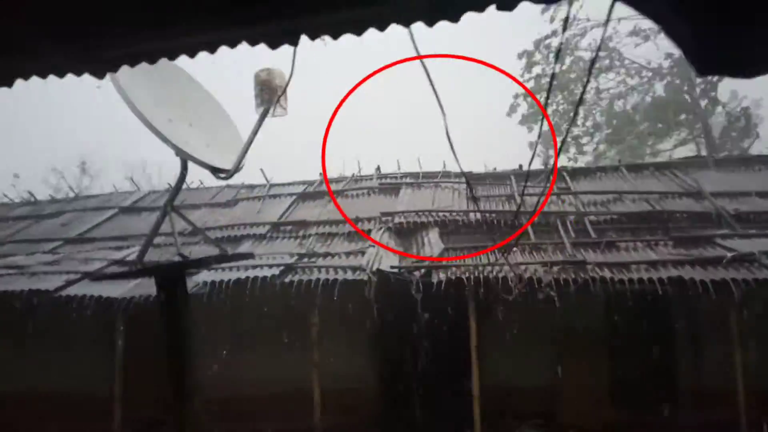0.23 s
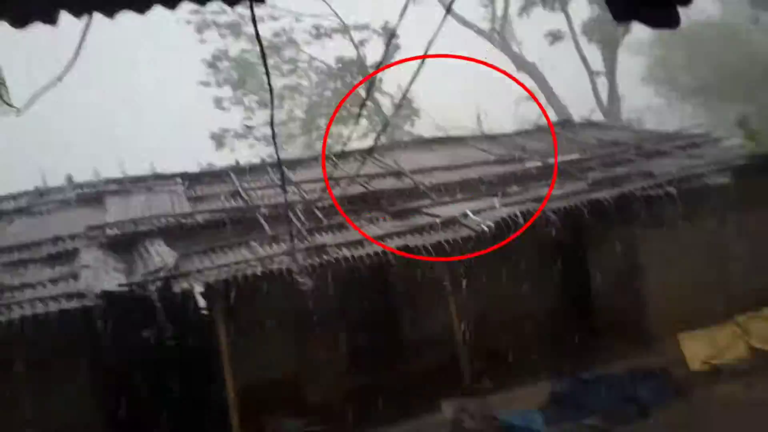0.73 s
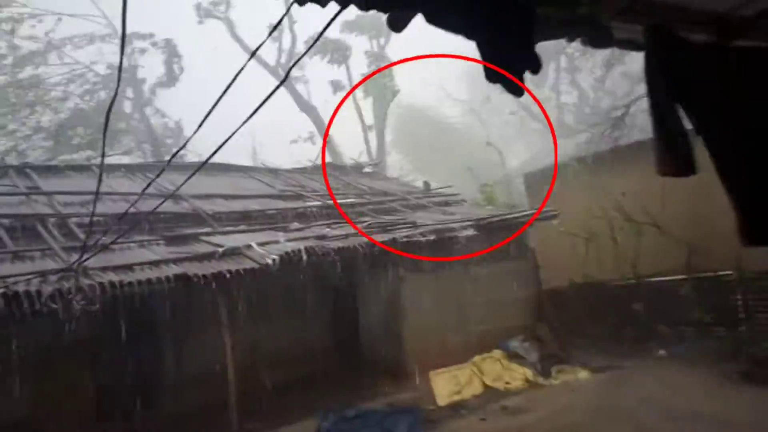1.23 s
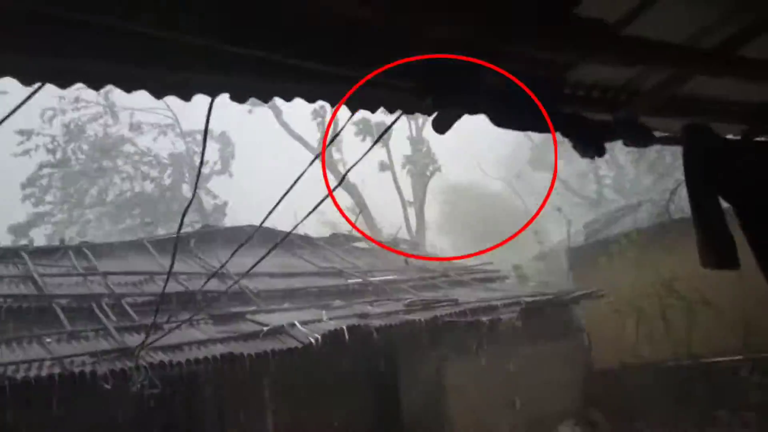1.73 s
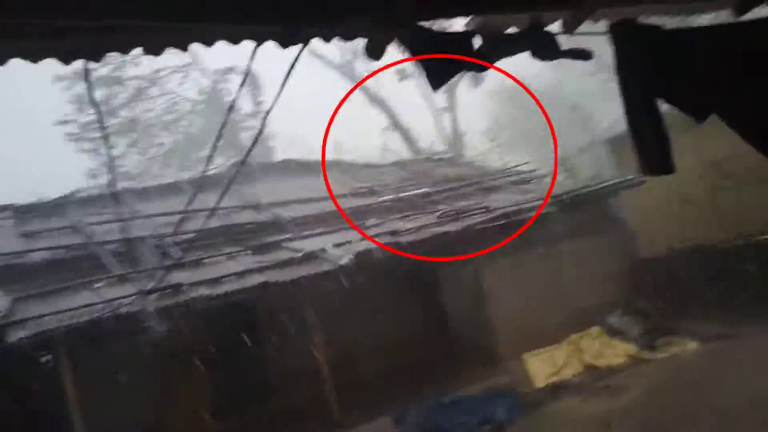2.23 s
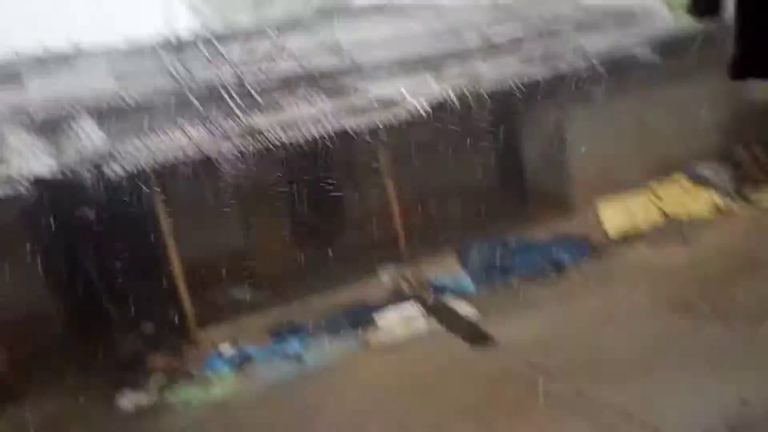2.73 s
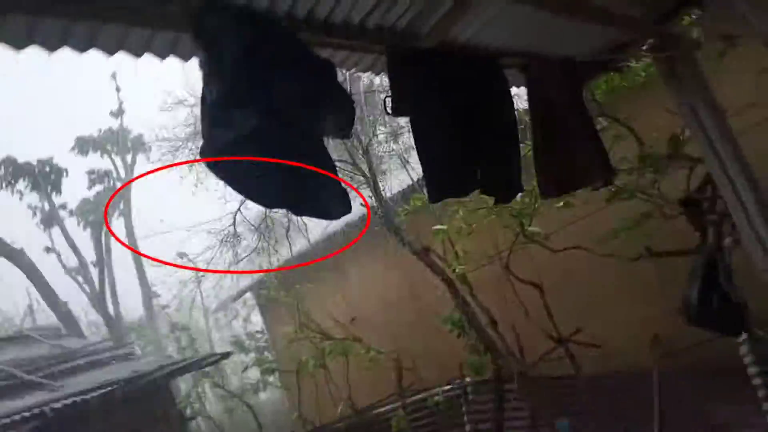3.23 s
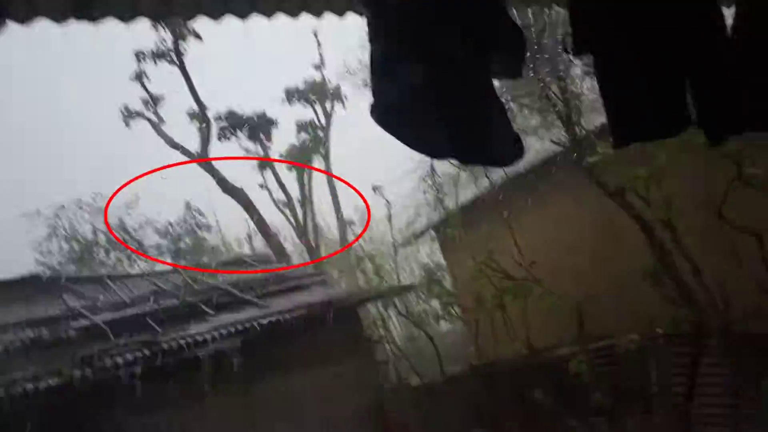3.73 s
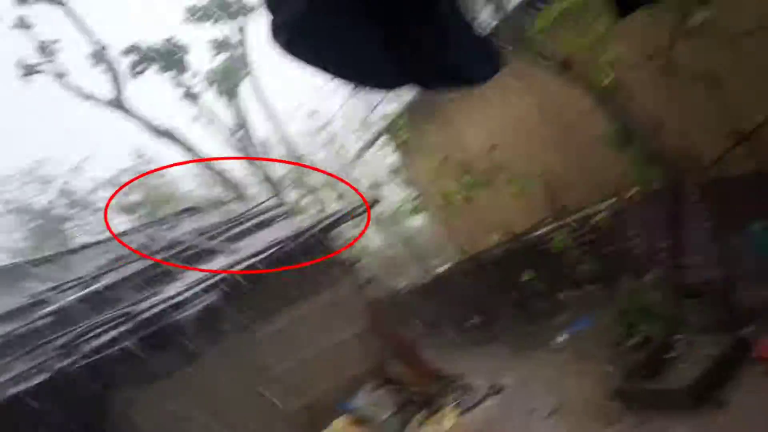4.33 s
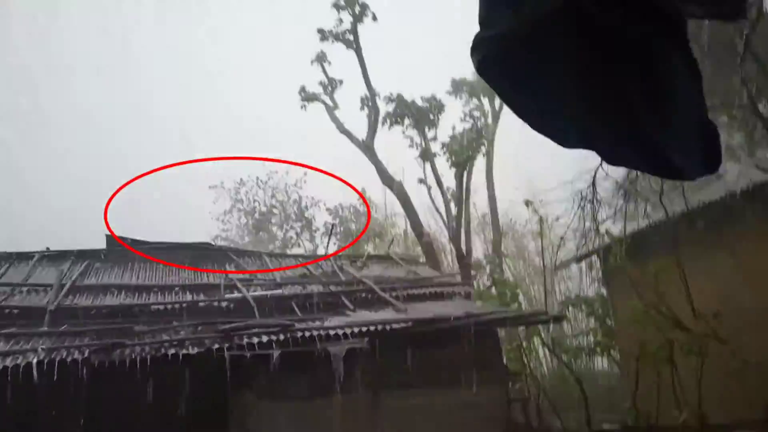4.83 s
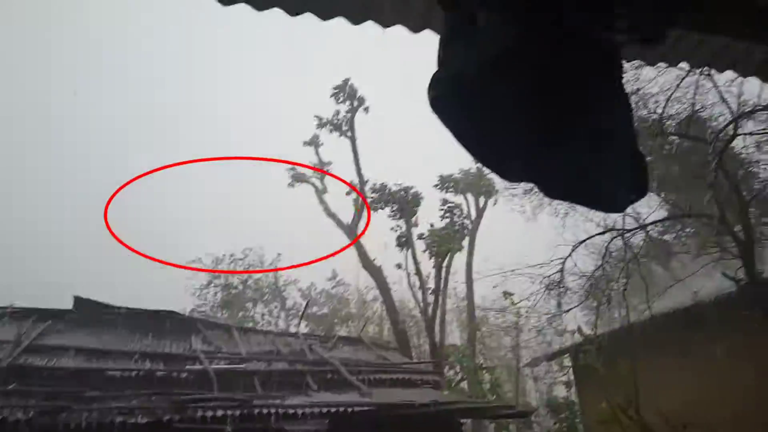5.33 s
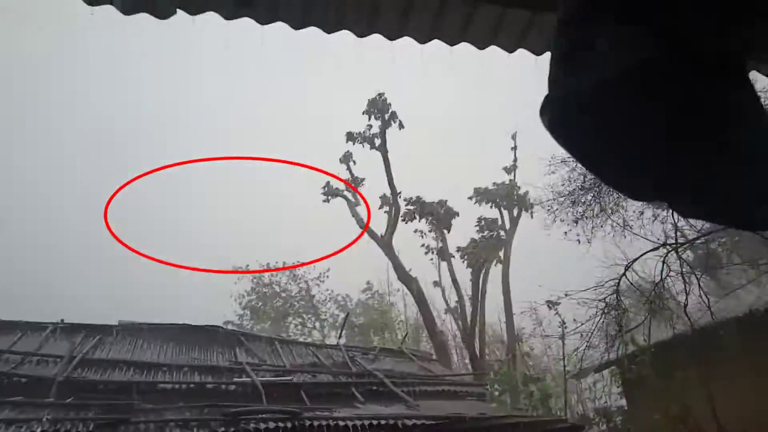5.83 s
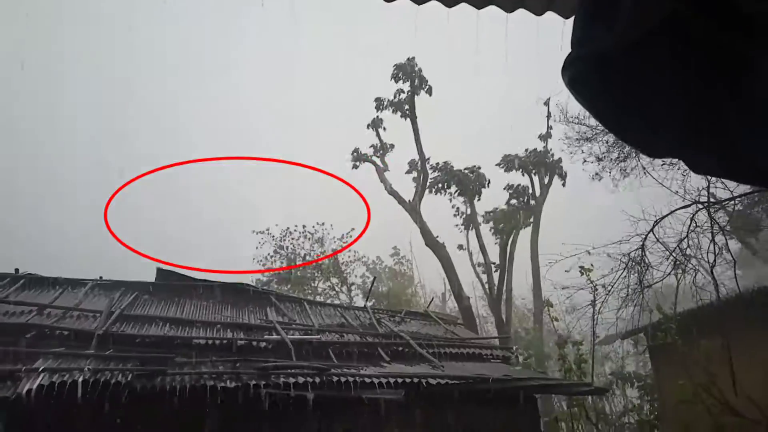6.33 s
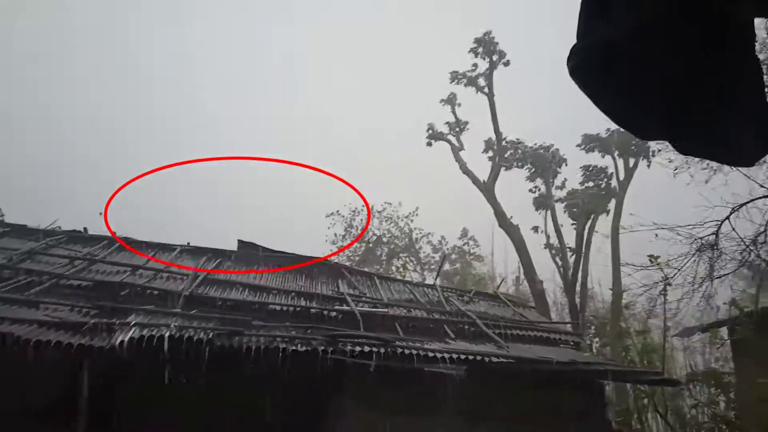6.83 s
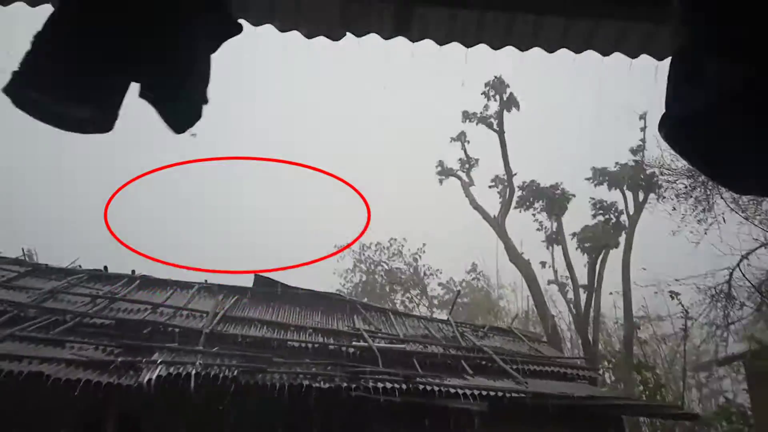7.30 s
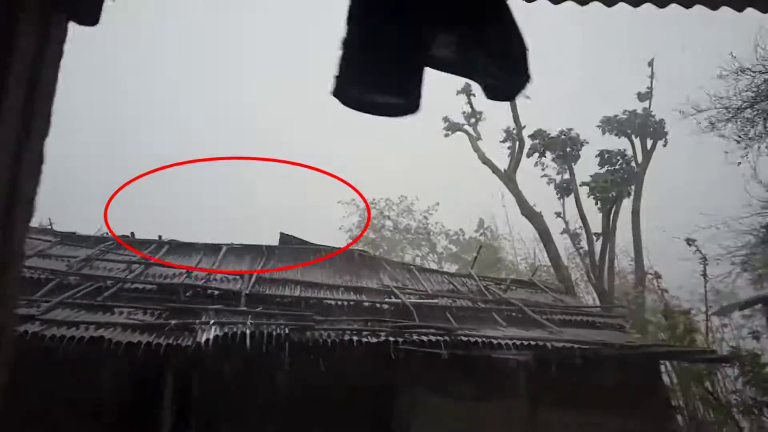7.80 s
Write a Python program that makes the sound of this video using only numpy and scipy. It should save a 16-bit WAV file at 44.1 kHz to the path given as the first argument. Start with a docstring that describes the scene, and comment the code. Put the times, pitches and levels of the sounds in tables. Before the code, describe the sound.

A windy downpour heard close by through one small microphone, the same in both channels. First, hissing spray, broad rain rush and roof drumming with loose-sheet knocks and short crackles. A tiny near-silent gap at three seconds breaks it; the rain swells back with less hiss and a hollow midrange colour that shifts. Soft low wind thumps grow frequent, and a few dull knocks return late.

```python
"""Heavy rain in a windstorm

Heard under an eave by one small microphone, in two scenes joined by a cut and a fade-in.
Dense random drops, coloured in bands, make the rush and spray and drum on corrugated roofs.
Struck resonances knock and thump, short noise bursts stand out, and low noise buffets in gusts.
In the second scene the microphone turns: spectra crossfade and a hollow resonance moves.
"""
import sys
import numpy as np
from scipy import signal
from scipy.fft import rfft, irfft, next_fast_len
from scipy.io import wavfile

SR = 44100
rng = np.random.default_rng(int(sys.argv[2]) if len(sys.argv) > 2 else 0)


def wav_record(signal):
    """Record a signal, one row per channel, as 16-bit PCM in the file named by sys.argv[1]."""
    frames = np.transpose(np.atleast_2d(signal))
    bounded = np.clip(frames, -1, 1)
    # unit amplitude maps onto the largest positive 16-bit level
    quanta = np.round(bounded * 32767).astype(np.int16)
    wavfile.write(sys.argv[1], SR, quanta)


N = 355578
TIME_S = np.arange(N) / SR


def from_db(db):
    """Decibels to amplitude gain."""
    return 10 ** (np.asarray(db) / 20)


def rms_one(x):
    """Scale to unit rms."""
    return x / np.sqrt(np.mean(x ** 2) + 1e-20)


def in_time(rows):
    """Interpolate a two-column time curve to one value per sample."""
    time_s, value = np.transpose(rows)
    return np.interp(TIME_S, time_s, value)


def colour(x, spectrum):
    """Filter x by a spectrum drawn over log frequency; rms 1."""
    size = next_fast_len(N)
    hz = np.maximum(np.arange(size // 2 + 1) * SR / size, 1)
    point_hz, point_db = np.transpose(spectrum)
    gain_db = np.interp(np.log(hz), np.log(point_hz), point_db, left=-100, right=-100)
    filtered = irfft(rfft(x, size) * from_db(gain_db), size)
    return rms_one(filtered[:N])


def drift(corner_hz):
    """Slow random wander: noise twice through a one-pole low-pass; rms 1."""
    r = np.exp(-2 * np.pi * corner_hz / SR)
    noise = rng.standard_normal(N + SR)
    wander = signal.lfilter([1], [1, -2 * r, r * r], noise)
    return rms_one(wander[SR:])  # first second settles the filter


def drops(per_s, spread_db, far_share, clump_db, clump_hz):
    """Sparse impacts of uneven size over the noise blur of far drops, swelling in clumps."""
    size_db = spread_db * np.minimum(rng.exponential(1, N), 4)
    impacts = from_db(size_db) * rng.choice([-1, 1], N)
    near = rms_one(impacts * (rng.random(N) < per_s / SR))
    far = rng.standard_normal(N)
    mix = np.sqrt(1 - far_share) * near + np.sqrt(far_share) * far  # far_share is of power
    return mix * from_db(clump_db * drift(clump_hz))


def ring(start_s, peak_db, pitch_hz, pole_t60_s):
    """Soft contact: a click through two equal resonances swells before it decays."""
    click = np.full(N, 1e-18)
    click[round(start_s * SR)] = 1
    r = from_db(-60 / (pole_t60_s * SR))
    w = 2 * np.pi * pitch_hz / SR
    resonance = [1, 0.0083, -1.004, 1, -2 * r * np.cos(w), r * r]
    tone = signal.sosfilt([resonance] * 2, click)
    return from_db(peak_db) * tone / np.abs(tone).max()


# microphone turn: (time [s], turn [0-1])
MICROPHONE_TURN = [(3.6, 0), (3.9, 0.3), (4.3, 0.35), (4.55, 1), (5.4, 0.81), (8.0, 0.93)]


def turning(x, before, after):
    """Crossfade between two colours of x as the microphone turns."""
    turn = in_time(MICROPHONE_TURN)
    return (1 - turn) * colour(x, before) + turn * colour(x, after)


# buffeting spectra: (frequency [Hz], relative density [dB])
BUFFET_SPECTRUM_FIRST = [(12, -53), (25, -26), (50, -21), (83, -3.5), (170, 1.5), (220, -48.5)]
BUFFET_SPECTRUM_SECOND = [(12, -44), (20, -11), (102, 3.5), (170, 3.5), (220, -8), (370, -120)]
# gusts on the microphone: (peak time [s], lift [dB], half length to 1/e of the lift [s])
WIND_GUSTS = [(0.5, 2.5, .5), (2.9, 3.5, .3), (3.322, 10, 0.13), (3.65, 4.5, .1), (4.0, 7.5, 0.14),
              (5.36, 5, 0.084), (5.755, 11, 0.11), (5.94, 5, .06), (6.713, 3, 0.14), (7.333, 12, 0.21),
              (8.06, 9, 0.25)]
CALM_FIRST_DB, CALM_SECOND_DB = -50, -49  # wind level between gusts


def buffeting():
    """Wind pressure on the microphone: low noise that flutters and swells with each gust."""
    eddies = rng.standard_normal(N) * from_db(2.2 * drift(17))
    gust_db = sum(lift_db * np.exp(-((TIME_S - peak_s) / half_s) ** 2)
                  for peak_s, lift_db, half_s in WIND_GUSTS)
    first = from_db(CALM_FIRST_DB + gust_db) * colour(eddies, BUFFET_SPECTRUM_FIRST)
    second = from_db(CALM_SECOND_DB + gust_db) * colour(eddies, BUFFET_SPECTRUM_SECOND)
    return first, second


# gust thumps: (time [s], tone peak [dB], pitch [Hz], push peak [dB])
GUST_THUMPS = [(2.82, -29, 150, -51), (3.959, -28, 100, -47), (4.945, -29, 141, -32),
               (5.754, -23, 171, -36), (5.82, -27, 161, -44), (6.695, -29, 100, -56),
               (7.177, -28, 164, -42), (7.236, -28, 134, -44), (7.425, -27, 150, -38),
               (7.99, -40, 139, -40)]


def thumps():
    """Gusts hit the microphone: a short low ring plus a one-sided pressure push."""
    out = np.zeros(N)
    push = signal.windows.hann(round(0.011 * SR))
    for start_s, peak_db, pitch_hz, push_db in GUST_THUMPS:
        out += ring(start_s, peak_db, pitch_hz, pole_t60_s=0.038)
        at = round(start_s * SR)
        out[at:at + len(push)] += from_db(push_db) * push
    return out


# dull knocks, probably loose sheets lifted by gusts: (time [s], peak [dB], pitch [Hz])
SHEET_KNOCKS = [(0.032, -33, 263), (0.064, -20.5, 494), (0.121, -26, 488), (0.444, -31, 785),
                (0.509, -27, 314), (0.569, -28.5, 450), (0.812, -25.5, 408), (0.869, -23, 594),
                (1.159, -30, 341), (1.708, -26.5, 404), (7.405, -27, 438), (7.591, -27, 251),
                (7.665, -23.5, 245)]


def knocks():
    """Each knock is one short, damped resonance."""
    return sum(ring(*row, pole_t60_s=0.045) for row in SHEET_KNOCKS)


# short band-passed noise bursts near 3 kHz and 5 kHz, some with a broadband crack:
# (time [s], peak [dB], centre [Hz], decay constant [s], broadband crack gain [dB])
NOISE_BURSTS = [(1.845, -17.5, 3100, .012, -23), (1.864, -14.5, 5300, 0.019, -11.5),
                (2.829, -17.5, 5400, 0.012, -34), (4.827, -17, 3500, 0.013, -40),
                (4.878, -18.5, 3100, .008, -40)]
BURST_WIDTH_RATIO, BURST_ATTACK_S = 0.2, 0.0052  # bandwidth / centre


def noise_bursts():
    """Band-passed noise plus a share of the same noise unfiltered, fast attack and decay."""
    out = np.zeros(N)
    t = np.arange(round(0.08 * SR)) / SR
    for start_s, peak_db, centre_hz, decay_s, crack_db in NOISE_BURSTS:
        noise = rng.standard_normal(len(t))
        envelope = np.minimum(t / BURST_ATTACK_S, 1) * np.exp(-t / decay_s)
        edges_hz = [centre_hz * (1 - BURST_WIDTH_RATIO / 2), centre_hz * (1 + BURST_WIDTH_RATIO / 2)]
        band = signal.butter(2, edges_hz, "band", fs=SR, output="sos")
        burst = envelope * (signal.sosfilt(band, noise) + from_db(crack_db) * noise)
        at = round(start_s * SR)
        out[at:at + len(t)] += from_db(peak_db) * burst / np.abs(burst).max()
    return out


# drumming spectra: (frequency [Hz], relative density [dB])
DRUM_SPECTRUM_FIRST = [(100, -56), (170, -9.5), (393, -3), (442, -5), (491, -3.5), (1000, -9.5),
                       (1300, -51), (2200, -120)]
DRUM_SPECTRUM_BEFORE_TURN = [(100, -41), (170, -13.5), (200, -5), (286, -8), (509, -0.5), (1000, -2.5),
                             (1300, -21), (2200, -120)]
DRUM_SPECTRUM_AFTER_TURN = [(100, -53), (170, -7), (420, -6), (494, -8), (565, -7), (1000, -13),
                            (1300, -58), (2200, -120)]
# drumming: (time [s], level [dB])
DRUM_LEVEL = [(0.0, -32), (0.35, -32.5), (0.48, -27), (0.7, -32.5), (0.83, -28), (0.96, -32.5),
              (1.4, -31.5), (2.1, -34.5), (2.48, -34.5), (2.83, -30), (2.95, -36.5), (3.17, -30.5),
              (3.32, -27.5), (3.65, -28.5), (4.3, -31), (4.8, -35.5), (5.4, -35), (5.82, -33.5), (6.4, -35),
              (7.64, -31.5), (8.06, -32)]


def drumming():
    """Big drops drum the roof sheets: sparser impacts in a low band."""
    heavy = drops(per_s=1500, spread_db=3, far_share=0.85, clump_db=0.9, clump_hz=40)
    gain = from_db(in_time(DRUM_LEVEL))
    first = gain * colour(heavy, DRUM_SPECTRUM_FIRST)
    second = gain * turning(heavy, DRUM_SPECTRUM_BEFORE_TURN, DRUM_SPECTRUM_AFTER_TURN)
    return first, second


# downpour strength, as rush: (time [s], level [dB])
RAIN_LEVEL = [(0.0, -27.5), (0.47, -25), (0.62, -27.5), (0.88, -29.5), (1.2, -26.5), (1.8, -27),
              (2.03, -29), (2.45, -29), (2.62, -28), (2.95, -28), (3.17, -25), (3.6, -25.5), (3.75, -27),
              (4.2, -28), (4.57, -23.5), (4.85, -25), (4.99, -26), (5.15, -24), (5.58, -27.5),
              (5.82, -25.5), (6.1, -27), (6.5, -26.5), (7.35, -26), (7.5, -24.5), (7.64, -26), (8.06, -24)]


def downpour_gain():
    """Strength of the downpour, shared by spray and rush."""
    return from_db(in_time(RAIN_LEVEL))


# spray spectra: (frequency [Hz], relative density [dB])
SPRAY_SPECTRUM_FIRST = [(5500, -27), (7000, -8.5), (7700, -6), (9000, -5), (10200, -1), (11500, -0.5),
                        (13000, -6), (14900, -10.5), (16000, -15)]
SPRAY_SPECTRUM_BEFORE_TURN = [(5500, -21), (7000, -4.5), (7600, -1.5), (8600, -6.5), (9900, -13),
                              (11700, -16), (13500, -17), (16000, -16)]
SPRAY_SPECTRUM_AFTER_TURN = [(5500, -24), (7000, -4), (7900, 0), (8600, -5.5), (9900, -12), (11700, -17.5),
                             (13500, -19.5), (16000, -18)]
# spray relative to the downpour strength: (time [s], level [dB])
SPRAY_LEVEL = [(0.0, -6.5), (1.8, -8), (2.4, -7), (2.95, -7), (3.17, -16), (4.15, -10.5), (4.6, -14),
               (5.5, -15), (6.75, -13.5), (8.06, -16.5)]


def spray():
    """Small drops and splashes hiss: dense impacts in a high band."""
    fine = drops(per_s=5000, spread_db=3, far_share=0.58, clump_db=0.66, clump_hz=25)
    gain = downpour_gain() * from_db(in_time(SPRAY_LEVEL))
    first = gain * colour(fine, SPRAY_SPECTRUM_FIRST)
    second = gain * turning(fine, SPRAY_SPECTRUM_BEFORE_TURN, SPRAY_SPECTRUM_AFTER_TURN)
    return first, second


# hollow near the microphone: (turn [0-1], resonance [Hz], resonance gain [dB])
HOLLOW_RESONANCE = [(0, 2000, -7), (0.33, 1800, 2), (0.9, 2130, 0)]
HOLLOW_WIDTH_HZ, HOLLOW_WAVER_DB, HOLLOW_BLOCK = 460, 1.5, 256


def hollow(x):
    """Add a resonance whose pitch and gain follow the turn; the gain wavers."""
    turn_points, point_hz, point_db = np.transpose(HOLLOW_RESONANCE)
    turn = in_time(MICROPHONE_TURN)
    hz = np.interp(turn, turn_points, point_hz)
    gain_db = np.interp(turn, turn_points, point_db) + HOLLOW_WAVER_DB * drift(4.8)
    r = np.exp(-np.pi * HOLLOW_WIDTH_HZ / SR)
    state, resonant = np.zeros(2), np.zeros(N)
    for i in range(0, N, HOLLOW_BLOCK):
        block = slice(i, i + HOLLOW_BLOCK)
        poles = [1, -2 * r * np.cos(2 * np.pi * hz[i] / SR), r * r]
        resonant[block], state = signal.lfilter([1, 0, -1], poles, x[block], zi=state)
    unit_peak = (1 - r * r) / 2
    return rms_one(x + from_db(gain_db) * unit_peak * resonant)


# rush spectra: (frequency [Hz], relative density [dB])
RUSH_SPECTRUM_FIRST = [(590, -20), (1000, -9), (1860, -7.5), (2370, -8), (3310, -8), (3830, -8), (5140, -9),
                       (5800, -10), (7000, -18), (9100, -42), (15400, -120)]
RUSH_SPECTRUM_BEFORE_TURN = [(600, -30), (1000, -12.5), (1340, -9.5), (1900, -12), (2700, -15), (3400, -13),
                             (3750, -18), (4250, -26), (5200, -27), (6200, -27), (7000, -26), (9000, -43)]
RUSH_SPECTRUM_AFTER_TURN = [(600, -12), (1000, -14), (1300, -9), (2100, -10), (2750, -11.5), (3560, -9.5),
                            (4030, -13), (4700, -20.5), (5300, -23), (6200, -22), (7000, -22), (9000, -38)]


def rush():
    """Countless drops on the roofs blur into a broad mid-band rush."""
    rain = drops(per_s=6000, spread_db=3, far_share=0.97, clump_db=0.43, clump_hz=62)
    gain = downpour_gain()
    first = gain * colour(rain, RUSH_SPECTRUM_FIRST)
    turned = turning(rain, RUSH_SPECTRUM_BEFORE_TURN, RUSH_SPECTRUM_AFTER_TURN)
    return first, gain * hollow(turned)


CUT_S = 2.9592
FADE_START_S, FADE_LENGTH_S, FADE_POWER, FLOOR_DB = 3.035, 0.12, 3.1, -66
TAIL_DB, TAIL_FALL_DB_PER_S = -22, 1500  # very short, faint noise tail


def join(first, second):
    """Cut from first to second: a very short, faint noise tail, near silence, then a fade-in."""
    fade = np.clip((TIME_S - FADE_START_S) / FADE_LENGTH_S, 0, 1) ** FADE_POWER
    tail = from_db(TAIL_DB - TAIL_FALL_DB_PER_S * np.abs(TIME_S - CUT_S))
    gain = np.maximum(fade, from_db(FLOOR_DB)) + tail
    return np.where(TIME_S < CUT_S, first, second * gain)


def scene():
    """Join the two scenes, add thumps, knocks and noise bursts; both channels alike."""
    layers = [buffeting(), drumming(), spray(), rush()]
    first = sum(layer[0] for layer in layers)
    second = sum(layer[1] for layer in layers)
    mono = join(first, second) + thumps() + knocks() + noise_bursts()
    return np.array([mono, mono])


def record(dry):
    """Steep elliptic low-pass: 0.5 dB ripple, 60 dB stopband."""
    low_pass = signal.ellip(12, 0.5, 60, 15480, fs=SR, output="sos")  # cutoff in Hz
    return signal.sosfilt(low_pass, dry)


dry = scene()
out = record(dry)
wav_record(out)
```